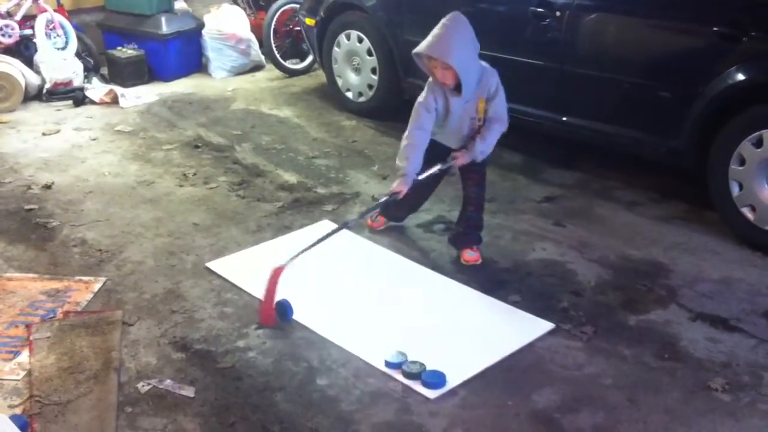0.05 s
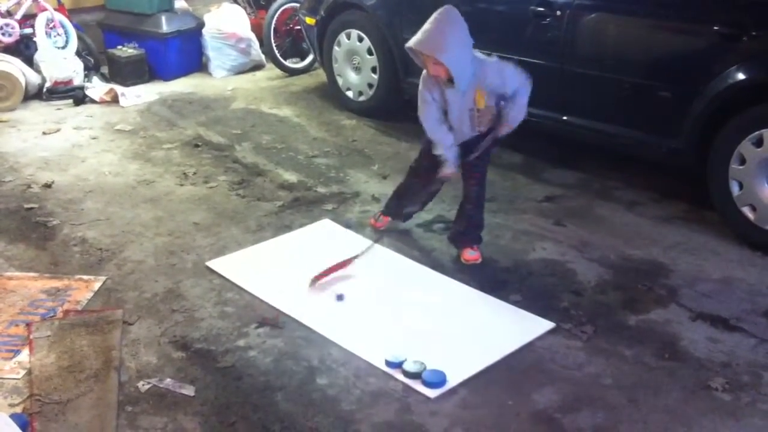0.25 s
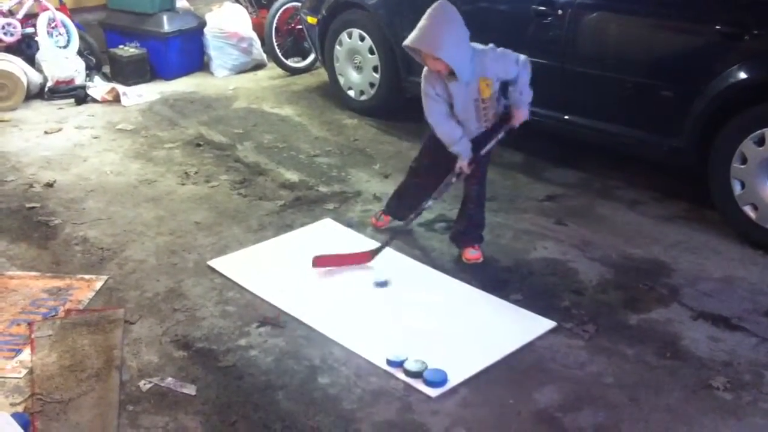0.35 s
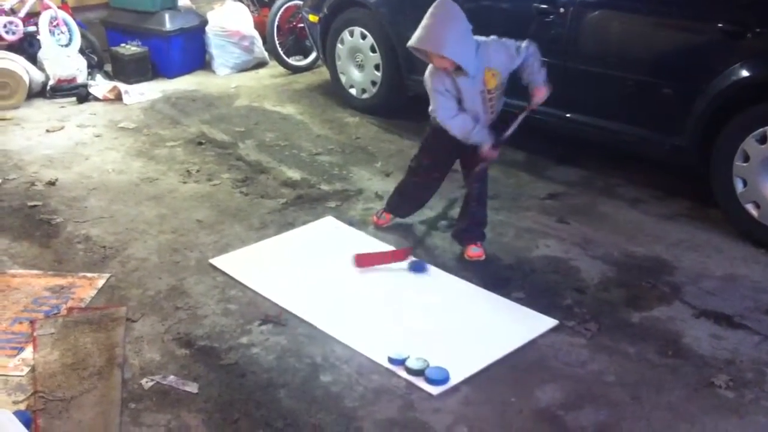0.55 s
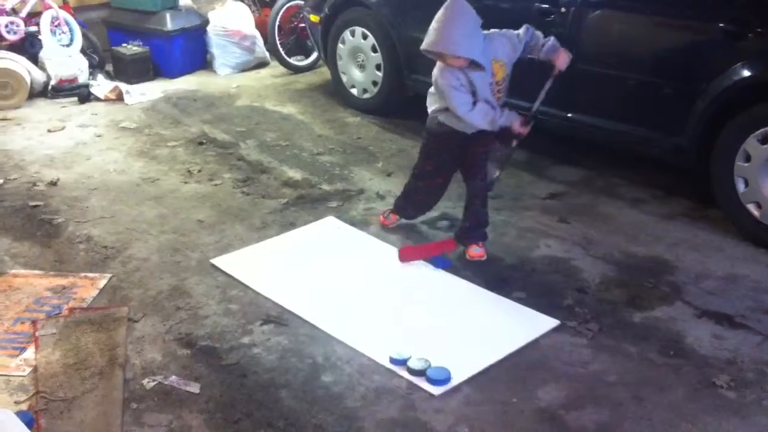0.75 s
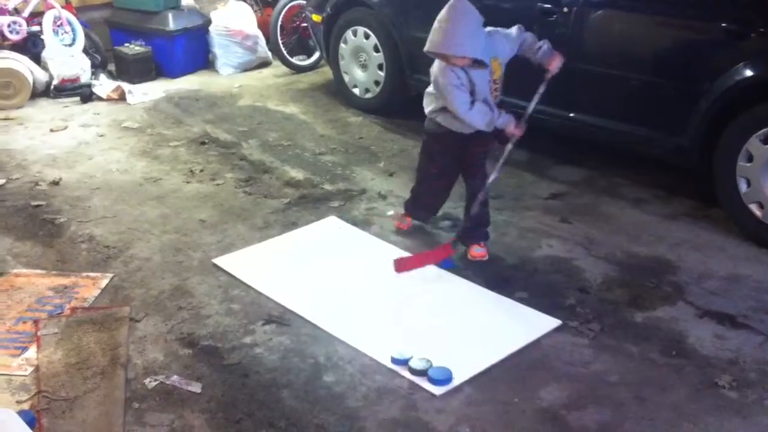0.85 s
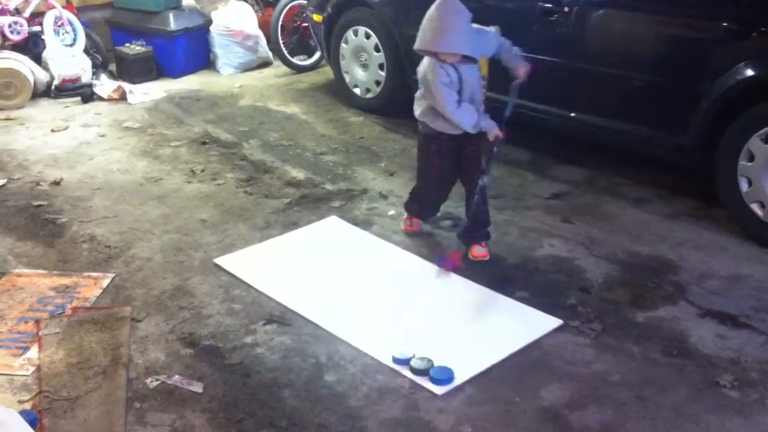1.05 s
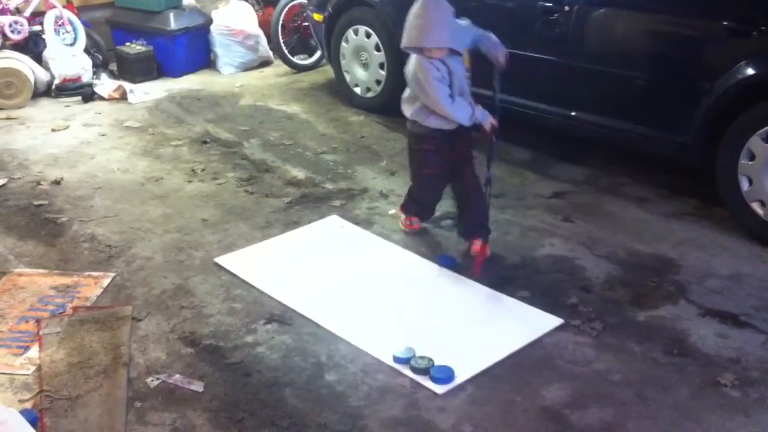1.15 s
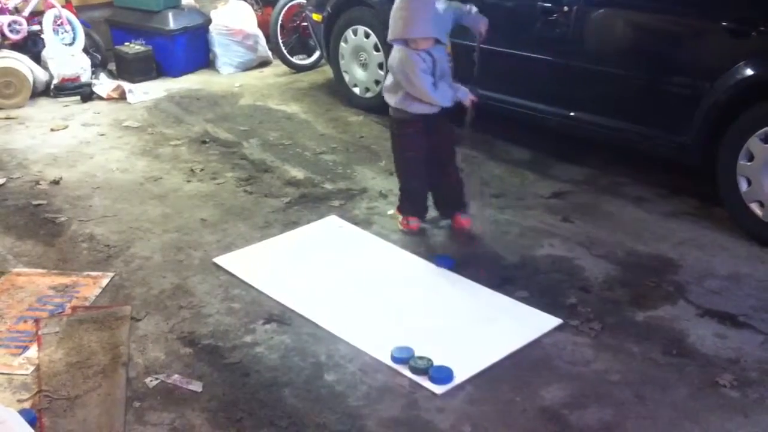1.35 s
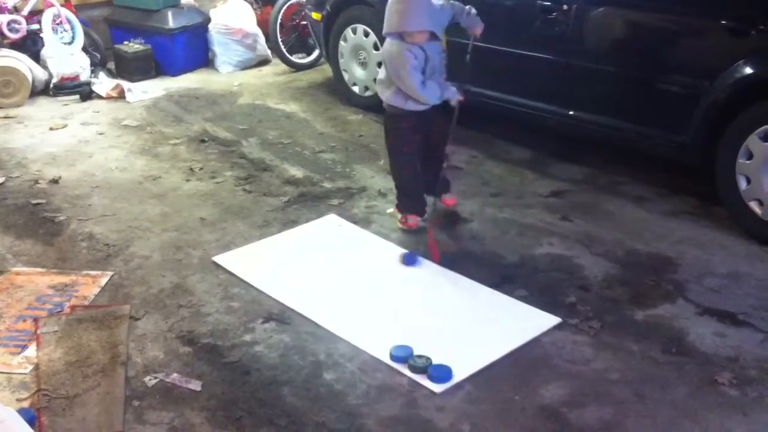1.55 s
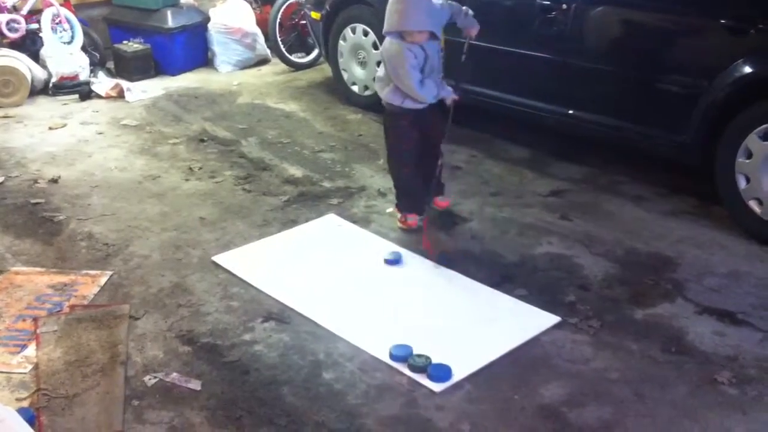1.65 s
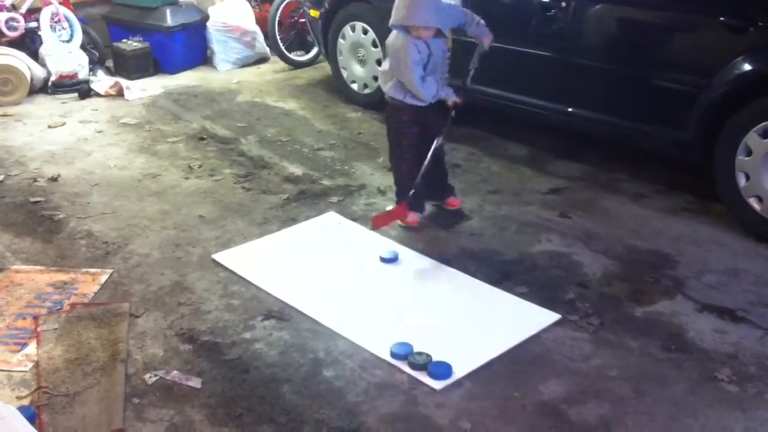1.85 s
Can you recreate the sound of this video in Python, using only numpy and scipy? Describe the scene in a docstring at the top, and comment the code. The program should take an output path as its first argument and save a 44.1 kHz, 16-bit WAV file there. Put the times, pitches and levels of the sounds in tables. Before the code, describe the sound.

A plastic hockey stick slaps a puck on a hard board in an echoing garage

```python
"""Stick and puck in the garage

A child plays with a hockey stick and a plastic puck on a board lying on a garage floor.
The blade taps, then slaps down hard; the board booms and the puck rolls off, wobbling. Shoes shuffle,
the blade scrapes along and knocks the puck back. Impacts ring decaying modes behind a broad click,
rubbing and rolling feed random grains through filters, and both echo between hard walls over a steady hum.
"""
import sys
import numpy as np
from scipy import signal
from scipy.fft import rfft, irfft
from scipy.io import wavfile

SR = 44100
rng = np.random.default_rng(int(sys.argv[2]) if len(sys.argv) > 2 else 0)


def persist_wave(psi):
    """Save psi, clipped to +-1, as 16-bit WAV."""
    counts = np.round(np.clip(psi, -1, 1) * 32767).astype(np.int16)
    wavfile.write(sys.argv[1], SR, np.atleast_2d(counts).T)


N = 83790
TIME = np.arange(N) / SR

# hum and hiss colour of the garage: (frequency [Hz], relative level [dB])
HUM_COLOUR = [(25, -21), (90, -15.5), (145, -1.5), (210, -1.5), (300, -4.5), (420, -15.5), (900, -14.5),
              (2500, -18), (6000, -27.5), (15000, -35)]
HUM_DB = -60

# echo decay of the garage: (frequency [Hz], time to fall 60 dB [s])
GARAGE_T60 = [(150, 1), (450, 1), (800, 0.47), (2000, 0.5), (4500, 0.48), (9000, 0.38), (15000, 0.28)]
DIRECT_DB, EARLY_DB, TAIL_DB = -4, -4, -4
EARLY_T60_S, TAIL_BUILD_S = 0.094, 0.0073
RUB_ROOM_DB, STEP_ROOM_DB, ROLL_ROOM_DB, GRIT_ROOM_DB = -6, -5, -3.5, -3.5

# friction grains, and the coarser bumps under the rolling puck
GRAINS_PER_S, GRAIN_SPREAD_DB = 3500, 4.5
BUMPS_PER_S, BUMP_SPREAD_DB = 350, 4

# shoes dragging on concrete:
# (start [s], rise [s], hold [s], fade to -60 dB [s], level [dB], brightness [dB per octave])
SHUFFLES = [(0.97, 0.082, 0.016, 0.41, -51.5, -2.5), (1.262, 0.029, 0.032, 0.29, -45.5, 2.5),
            (1.345, .011, 0.005, 0.23, -39.5, 1), (1.496, 0.011, 0.042, 0.14, -36.5, -5)]
# colour of the dragging shoes: (frequency [Hz], relative level [dB])
SHUFFLE_COLOUR = [(40, -59), (100, -43.5), (350, -17), (900, -6.5), (1600, -5), (3300, -2), (4500, -4),
                  (7000, -7), (12000, -11), (16000, -19)]
# swish of clothing as the body turns: (time [s], level [dB])
SWISH_LEVEL = [(0, -111), (.4, -80), (.7, -61), (.8, -58), (.87, -53), (.95, -47), (1.04, -44.5),
               (1.11, -51.5), (1.24, -59), (1.3, -53), (1.45, -76), (1.66, -57), (1.71, -49), (1.76, -75),
               (1.9, -69)]
# colour of the clothing: (frequency [Hz], relative level [dB])
CLOTH_COLOUR = [(100, -38.5), (1000, -8.5), (2200, -6), (3300, -1), (5000, -7), (8000, -3.5), (10500, 0.5),
                (13500, -4.5), (16000, -11)]
# soft footfalls: (time [s], level [dB])
STEPS = [(1.339, -44), (1.498, -40.5)]
# colour of a footfall: (frequency [Hz], relative level [dB])
STEP_COLOUR = [(40, -42), (150, -1.5), (400, -0.5), (700, -2), (1000, -10), (2000, -28), (4000, -47),
               (16000, -70)]
STEP_RISE_S, STEP_HOLD_S, STEP_FADE_S = 0.003, 0.0042, 0.038

# grit snapping under puck and blade: (time [s], level [dB])
GRIT_TICKS = [(0.409, -22), (0.814, -27.5), (0.847, -38), (1.133, -24.5), (1.622, -25), (1.638, -38),
              (1.649, -10), (1.676, -37), (1.706, -15), (1.7215, -9)]
# colour of a grit tick: (frequency [Hz], relative level [dB])
GRIT_COLOUR = [(100, -28), (2000, -5), (6000, -11.5), (9000, -4.5), (12500, -10), (16000, -26.5)]

# strength of the rolling puck, for both rumble and rim hiss: (time [s], level [dB])
ROLL_LEVEL = [(0, -100), (.3, -90), (.4, -42), (.57, -49), (.64, -44.5), (.72, -49.5), (.8, -52),
              (.89, -55.5), (.97, -79), (1.2, -89), (1.6, -48.5), (1.7, -37), (1.8, -49.5), (1.9, -53.5)]
ROLL_TILT_DB_PER_OCTAVE, ROLL_CLICK_DB = 3, -1
WOBBLE_HZ, WOBBLE_DB = 34, 6  # swings this far up and down
# hiss of the puck's rim: (frequency [Hz], relative level [dB])
GLIDE_COLOUR = [(100, -32), (1500, -8), (3500, 1.5), (5500, -2), (7500, -5.5), (9200, -1.5), (10200, -12.5),
                (16000, -19)]
GLIDE_DB = -6

# knocks of puck and blade on the board:
# (time [s], level [dB], brightness [dB per octave], room [dB], pitch of the struck spot [Hz])
BOARD_HITS = [(0.2625, 2, -8, 3.5, 773), (0.2802, 16.5, -2, -3.5, 867), (0.2957, 3, 2, -9, 853),
              (0.367, -1.5, -3, 0, 790), (0.472, 1.5, -3.5, -19, 700), (0.830, -16, 0, -13, 804),
              (0.844, -13, -6.5, -6.5, 667), (1.6555, 4, -6, -11.5, 1203), (1.6648, 4, -1.5, -3.5, 712),
              (1.722, -3.5, -1, -7, 712), (1.806, -4.5, -2.5, -11.5, 773), (1.838, -12, -3, -19, 700)]
# ringing of the board: (frequency [Hz], relative level [dB], time to fall 60 dB [s])
BOARD_MODES = [(487.4, -20.5, 0.42), (555.2, -18, 0.39), (672, -15, 0.36), (699, -12, 0.023),
               (813, -13, 0.091), (842.6, -15.5, 0.069), (903, -22.5, 0.033), (1165, -21.5, .15)]
# broad thud of the board: (frequency [Hz], relative level [dB])
BOARD_COLOUR = [(50, -49), (110, -40.5), (175, -18.5), (240, -28.5), (400, -23), (560, -6), (800, 8),
                (1100, -1), (1700, -7.5), (3000, -21), (6000, -38), (16000, -69)]
BOARD_THUD_DB, BOARD_SPOT_DB, BOARD_SPOT_T60_S = -5, -5, 0.038

# the blade meets the puck: (time [s], level [dB], room [dB])
PUCK_HITS = [(0.2767, 11, 3), (1.6536, 5, -12)]
# ringing of the puck: (frequency [Hz], relative level [dB], time to fall 60 dB [s])
PUCK_MODES = [(1160, -8.5, 0.03), (1420, -7, 0.0387), (1664, -12.5, 0.051), (1912, -6.5, 0.06),
              (2074, -5, 0.039)]
# broad clack of the puck: (frequency [Hz], relative level [dB])
PUCK_COLOUR = [(80, -47.5), (330, -12), (750, -4), (1800, 1), (2900, -8), (5500, -26.5), (16000, -44)]
PUCK_CLACK_DB = -3.5

# blade sliding:
# (start [s], rise [s], hold [s], fade to -60 dB [s], level [dB], brightness [dB per octave])
SCRAPES = [(0.185, 0.002, 0.015, 0.76, -27.5, 3), (1.204, 0.003, 0.0072, 0.67, -49.5, 2.5),
           (1.466, 0.013, 0.0052, 0.3, -31.5, 1.95)]
# ringing of the sliding blade: (frequency [Hz], relative level [dB], time to fall 60 dB [s])
SCRAPE_MODES = [(2020, -8.5, 0.085), (2200, -15, 0.062), (2600, -19, 0.036), (3023, -9.5, 0.076)]
# broad scrape: (frequency [Hz], relative level [dB])
SCRAPE_COLOUR = [(50, -63), (120, -64), (330, 1.5), (800, 0.5), (1300, -3.5), (2100, 6), (3800, -11),
                 (6500, -8), (10000, -17), (16000, -33.5)]
# blade strikes:
# (time [s], level [dB], brightness [dB per octave], room [dB], pitch of the struck spot [Hz])
BLADE_HITS = [(0.1878, 3, 2.5, -3.5, 2090), (0.2534, 2, -0.9, 5, 2870), (0.2734, 14.5, 1.14, 0, 2295),
              (1.6532, -2, -.5, 2, 1955)]
# ringing of the blade: (frequency [Hz], relative level [dB], time to fall 60 dB [s])
BLADE_MODES = [(1206, -10, 0.1), (1407, -9.5, 0.13), (1599, -40, 0.054), (1686, -18, 0.07),
               (1862, -5, 0.032), (1955, -23.5, 0.15), (2168, -12, 0.038), (2764, -13, 0.038),
               (2845, -39.5, 0.3), (3020, -16, 0.24), (4377, -38.5, 0.18)]
# broad crack of the blade: (frequency [Hz], relative level [dB])
BLADE_COLOUR = [(50, -60), (120, -49), (230, -28), (320, -14), (430, -27), (650, -5), (1100, -9.5),
                (1800, 1), (2900, -4.5), (3900, -8), (4700, -8), (5500, -13.5), (9000, -20), (12000, -27.5),
                (16000, -37)]
BLADE_CRACK_DB, BLADE_SPOT_DB, BLADE_SPOT_T60_S = 1, -5.5, 0.014

MIC_LOW_CUT_HZ, MIC_TOP_CUT_HZ = 34, 16000


def from_db(db):
    """Decibels to gain."""
    return 10 ** (np.asarray(db) / 20)


def at_hz(points, hz):
    """Read a frequency table on a log-frequency axis."""
    table_hz, values = np.transpose(points)
    return np.interp(np.log(np.maximum(hz, 1)), np.log(table_hz), values)


def level(curve):
    """Gain over time from (time [s], level [dB]) points."""
    return from_db(np.interp(TIME, *np.transpose(curve)))


def unit(x):
    """Scale to an energy of one."""
    return x / np.sqrt(np.sum(x ** 2) + 1e-20)


def decay(t, t60):
    """Exponential fall by 60 dB in t60 seconds."""
    return np.exp(-np.log(1000) * t / t60)


def band_pass(x, low_hz, high_hz):
    """Keep the band between two frequencies."""
    return signal.sosfilt(signal.butter(2, [low_hz, high_hz], "band", fs=SR, output="sos"), x)


def through(x, response):
    """Pass a sound through an impulse response."""
    return signal.fftconvolve(x, response)[:N]


def click(colour, tilt_db=0, size=4096):
    """Minimum-phase click of unit energy in the given colour, tilted in dB per octave."""
    hz = np.maximum(np.arange(size // 2 + 1) * SR / size, 20)
    spectrum_db = at_hz(colour, hz) + tilt_db * np.log2(hz / hz.mean())
    # folding the cepstrum packs the energy right after the contact
    cepstrum = irfft(np.log(from_db(spectrum_db)))
    cepstrum[size // 2:] = 0
    return unit(irfft(np.exp(2 * rfft(cepstrum))))


def mode(hz, t60):
    """One dying partial of unit energy, confined to the octaves around its pitch."""
    t = TIME[:N // 2]
    ring = np.sin(2 * np.pi * hz * t) * decay(t, t60)
    return unit(band_pass(ring, hz / 2, hz * 2))


def body(colour, modes, tilt_db, click_db):
    """Unit-energy response of a solid object: a broad click and its ringing modes."""
    contact = click(colour, tilt_db)
    # neighbouring modes start in opposite directions
    rings = sum((-1) ** k * from_db(db) * mode(hz, t60) for k, (hz, db, t60) in enumerate(modes))
    contact = np.pad(contact, (0, len(rings) - len(contact)))
    return unit(rings + from_db(click_db) * contact)


def garage(x, room_db):
    """Direct sound, a quick cluster of reflections off floor and car, and a tail that dies band by band."""
    t = TIME[:N // 2]
    white = rng.standard_normal((3, len(t)))
    edges = np.geomspace(60, 19000, 15)
    tail = 0
    for k, (low, high) in enumerate(zip(edges, edges[1:])):
        band = band_pass(white[k % 2], low, high)
        tail = tail + band * decay(t, at_hz(GARAGE_T60, np.sqrt(low * high)))
    tail = unit(tail * (1 - np.exp(-t / TAIL_BUILD_S)))
    early = unit(white[2] * decay(t, EARLY_T60_S))
    # a drier room setting thins the early cluster by half as many dB
    early_db = EARLY_DB + min(room_db, 0) / 2
    response = from_db(TAIL_DB + room_db) * tail + from_db(early_db) * early
    response[0] += from_db(DIRECT_DB)
    return through(np.pad(x, (0, N - len(x))), response)


def blow(start, db, response, room_db):
    """One impact, heard in the garage from its moment on."""
    echoed = garage(response, room_db)
    return from_db(db) * np.pad(echoed, (int(start * SR), 0))[:N]


def grains(per_s, spread_db):
    """Random tiny contacts of uneven size and either sign; rms 1."""
    sizes = from_db(spread_db * np.minimum(rng.exponential(1, N), 4))
    signed = sizes * rng.choice([-1, 1], N)
    return unit(signed * (rng.random(N) < per_s / SR)) * np.sqrt(N)


def friction():
    """Dense grains of two surfaces rubbing."""
    return grains(GRAINS_PER_S, GRAIN_SPREAD_DB)


def stroke(start, rise, hold, fade, db):
    """Friction grains under a rise, a hold and a fade."""
    t = TIME - start
    shape = np.clip(t / rise, 0, 1) * decay(np.maximum(t - rise - hold, 0), fade)
    return from_db(db) * shape * friction()


def background():
    """Steady low hum and faint hiss of the garage: white noise coloured by a filter."""
    colour = click(HUM_COLOUR)
    white = rng.standard_normal(N + len(colour) - 1)
    return from_db(HUM_DB) * signal.fftconvolve(white, colour, "valid")


def player():
    """Shoes drag and clothing swishes as filtered friction; footfalls are short, dull puffs of it."""
    shoes = sum(through(stroke(*row), click(SHUFFLE_COLOUR, tilt)) for *row, tilt in SHUFFLES)
    cloth = through(level(SWISH_LEVEL) * friction(), click(CLOTH_COLOUR))
    puffs = sum(stroke(start, STEP_RISE_S, STEP_HOLD_S, STEP_FADE_S, db) for start, db in STEPS)
    steps = through(puffs, click(STEP_COLOUR))
    return garage(shoes + cloth, RUB_ROOM_DB) + garage(steps, STEP_ROOM_DB)


def grit():
    """Grit snaps under puck and blade as bright, modeless ticks."""
    return sum(blow(start, db, click(GRIT_COLOUR), GRIT_ROOM_DB) for start, db in GRIT_TICKS)


def rolling_puck():
    """Bumps that swell and ebb with the wobble make the board rumble, while the puck's rim hisses."""
    strength = level(ROLL_LEVEL)
    wobble = from_db(WOBBLE_DB * np.sin(2 * np.pi * WOBBLE_HZ * TIME))
    bumps = strength * wobble * grains(BUMPS_PER_S, BUMP_SPREAD_DB)
    board_response = body(BOARD_COLOUR, BOARD_MODES, ROLL_TILT_DB_PER_OCTAVE, ROLL_CLICK_DB)
    rumble = through(bumps, board_response)
    rim_hiss = from_db(GLIDE_DB) * through(strength * friction(), click(GLIDE_COLOUR))
    return garage(rumble + rim_hiss, ROLL_ROOM_DB)


def board():
    """Each knock makes the board boom: shared modes, a short mode of the struck spot and a broad thud."""
    knocks = 0
    for start, db, tilt, room, spot_hz in BOARD_HITS:
        modes = BOARD_MODES + [(spot_hz, BOARD_SPOT_DB, BOARD_SPOT_T60_S)]
        knocks = knocks + blow(start, db, body(BOARD_COLOUR, modes, tilt, BOARD_THUD_DB), room)
    return knocks


def puck():
    """The hollow plastic puck gives a short, mid-pitched clack when the blade meets it."""
    return sum(blow(start, db, body(PUCK_COLOUR, PUCK_MODES, 0, PUCK_CLACK_DB), room)
               for start, db, room in PUCK_HITS)


def scraping_blade():
    """The sliding blade hisses: friction grains excite its modes and a broad scrape."""
    slides = sum(through(stroke(*row), body(SCRAPE_COLOUR, SCRAPE_MODES, tilt, 0))
                 for *row, tilt in SCRAPES)
    return garage(slides, RUB_ROOM_DB)


def striking_blade():
    """The plastic blade cracks on each strike: shared modes, a short mode of the struck spot and a click."""
    strikes = 0
    for start, db, tilt, room, spot_hz in BLADE_HITS:
        modes = BLADE_MODES + [(spot_hz, BLADE_SPOT_DB, BLADE_SPOT_T60_S)]
        strikes = strikes + blow(start, db, body(BLADE_COLOUR, modes, tilt, BLADE_CRACK_DB), room)
    return strikes


def scene():
    """All sources at one microphone."""
    surroundings = background() + player()
    on_the_board = grit() + rolling_puck() + board() + puck()
    stick = scraping_blade() + striking_blade()
    return (surroundings + on_the_board + stick)[None]


def record(dry):
    """The microphone sheds deep bass, the loudest peaks are rounded and the top is cut."""
    ceiling = 0.88
    low_cut = signal.butter(1, MIC_LOW_CUT_HZ, "high", fs=SR, output="sos")
    thin = signal.sosfilt(low_cut, dry)
    rounded = ceiling * np.tanh(thin / ceiling)
    top_cut = signal.ellip(10, 0.1, 80, MIC_TOP_CUT_HZ, fs=SR, output="sos")
    return signal.sosfilt(top_cut, rounded)


dry = scene()
out = record(dry)
persist_wave(out)
```